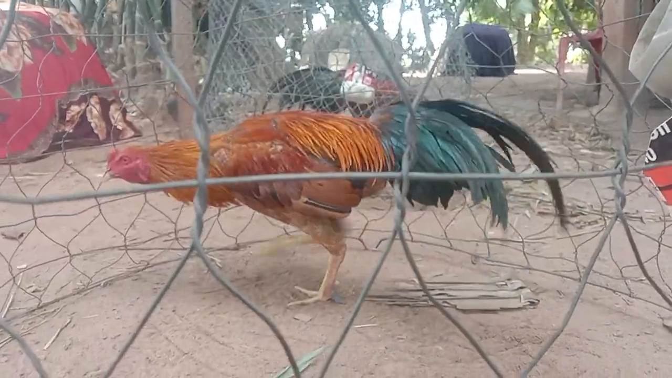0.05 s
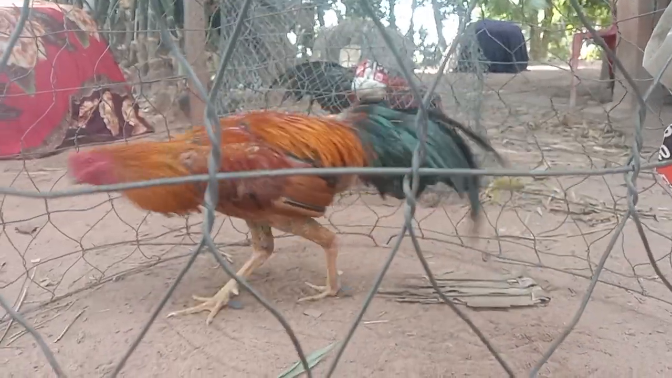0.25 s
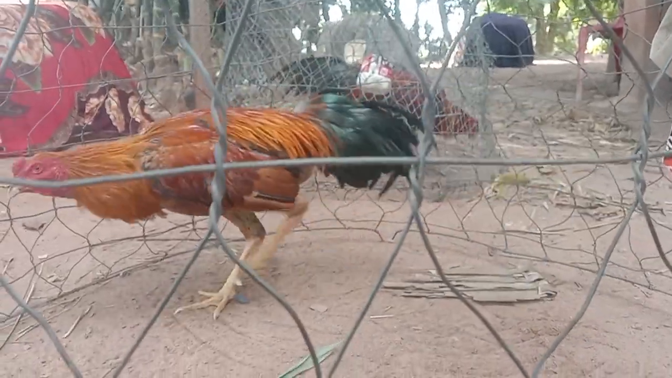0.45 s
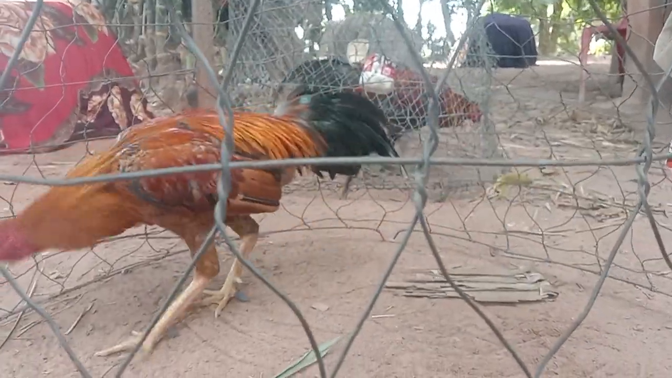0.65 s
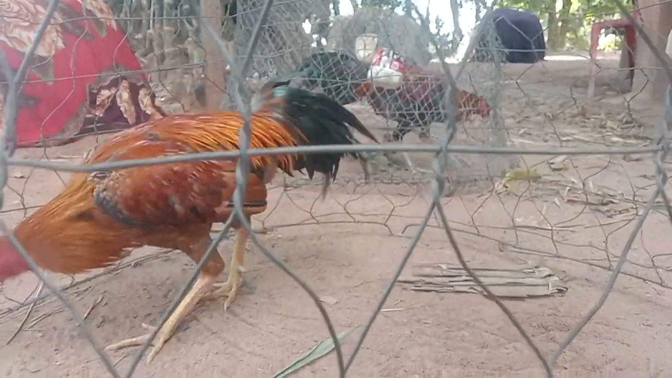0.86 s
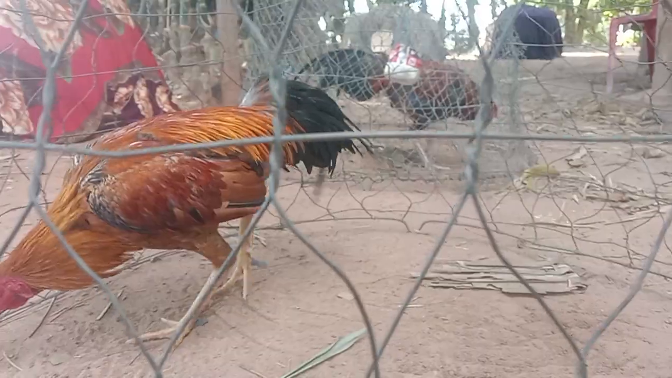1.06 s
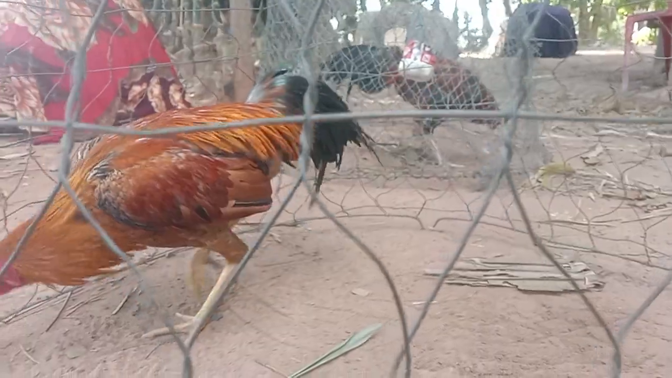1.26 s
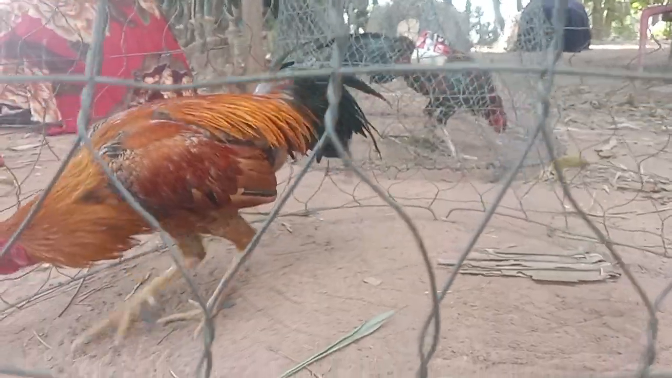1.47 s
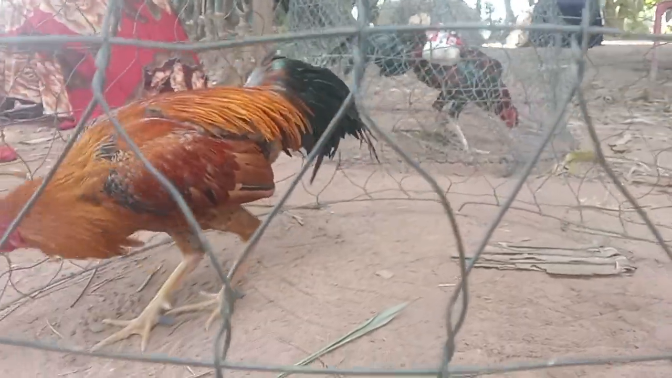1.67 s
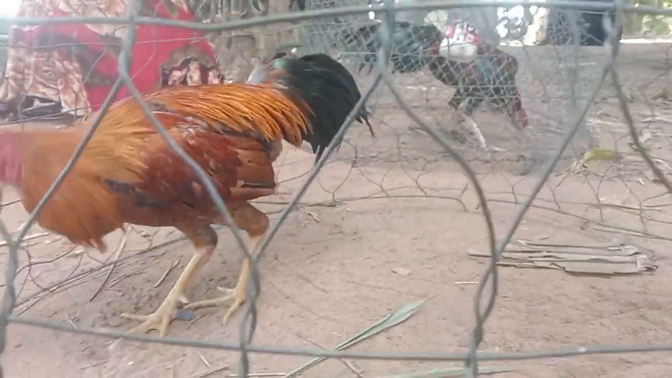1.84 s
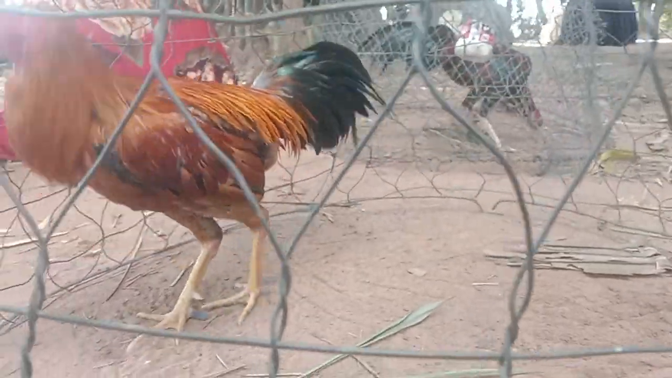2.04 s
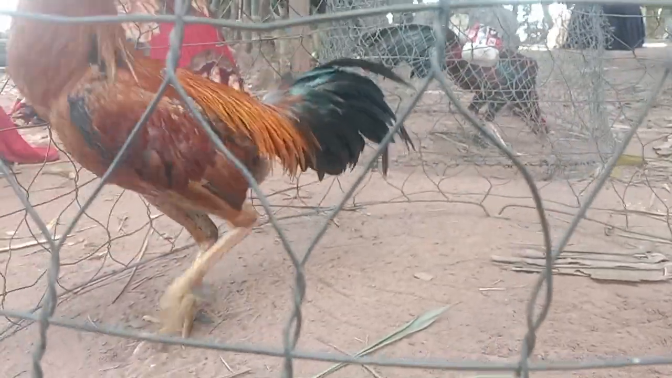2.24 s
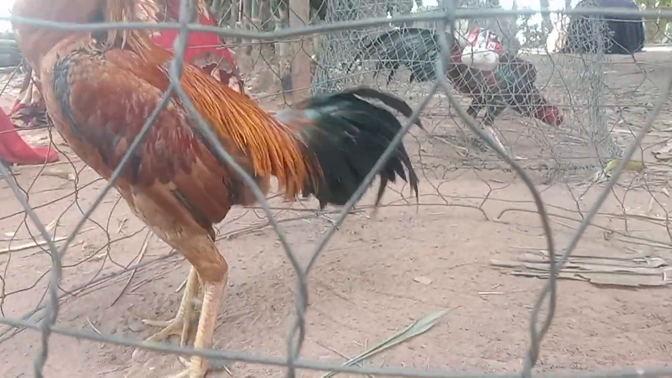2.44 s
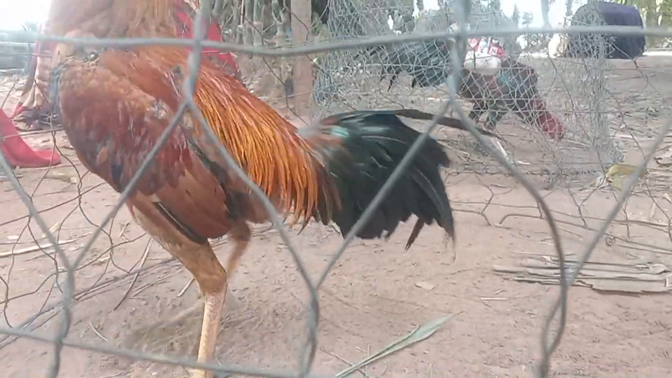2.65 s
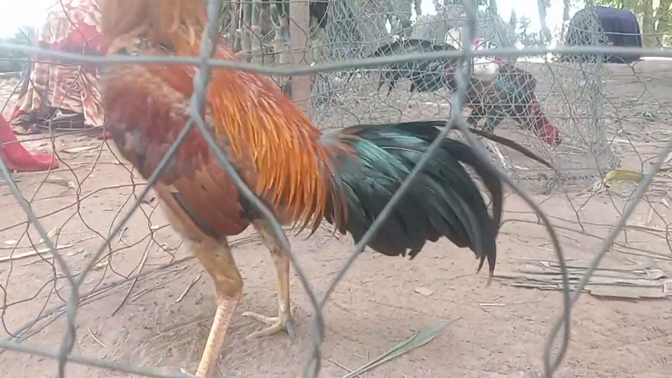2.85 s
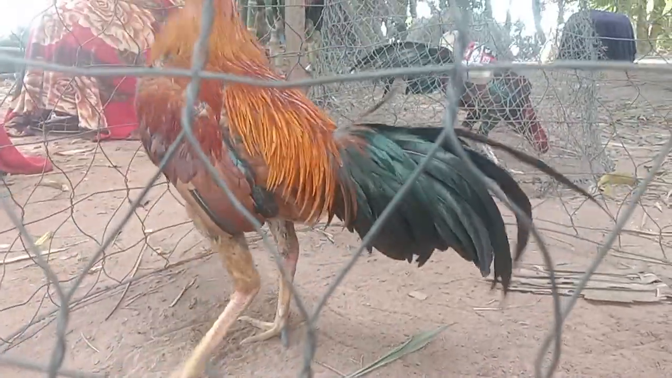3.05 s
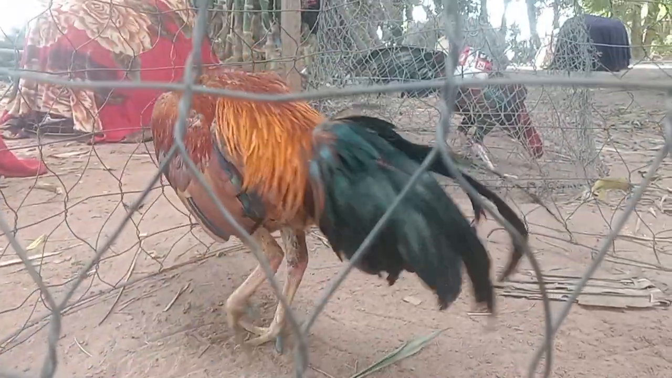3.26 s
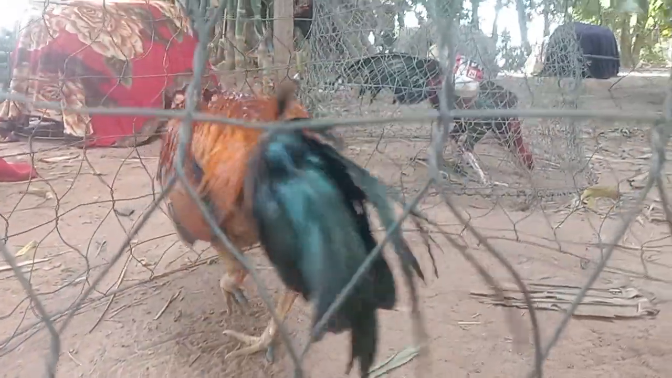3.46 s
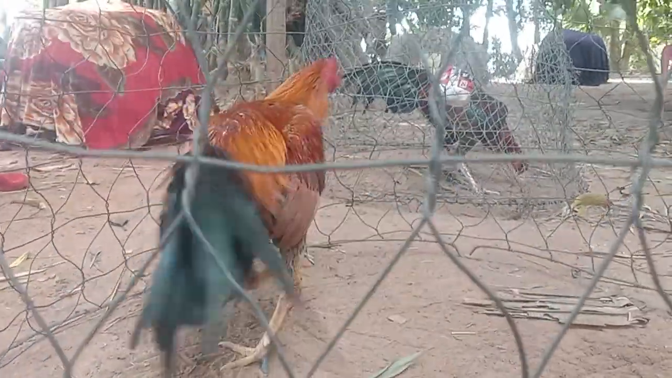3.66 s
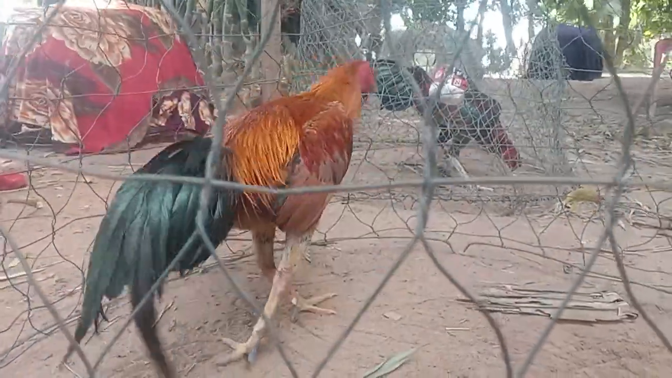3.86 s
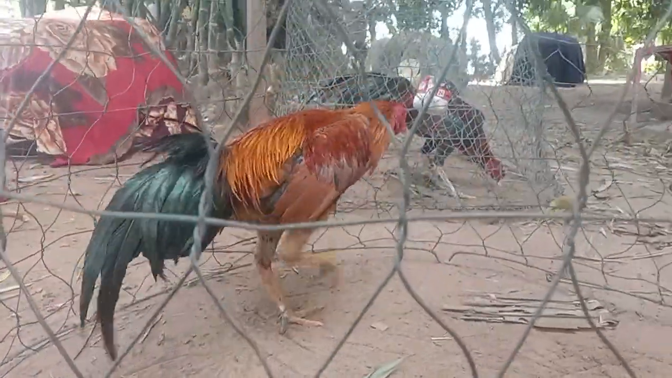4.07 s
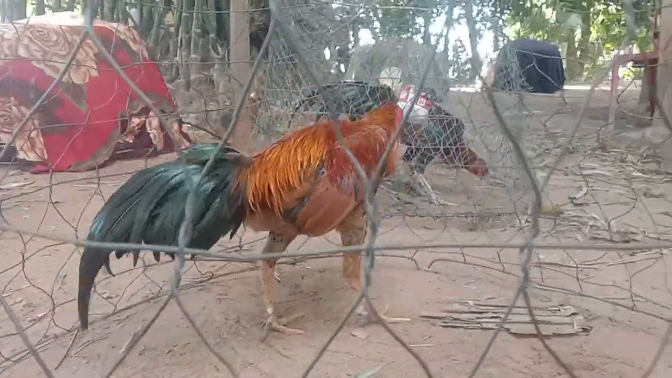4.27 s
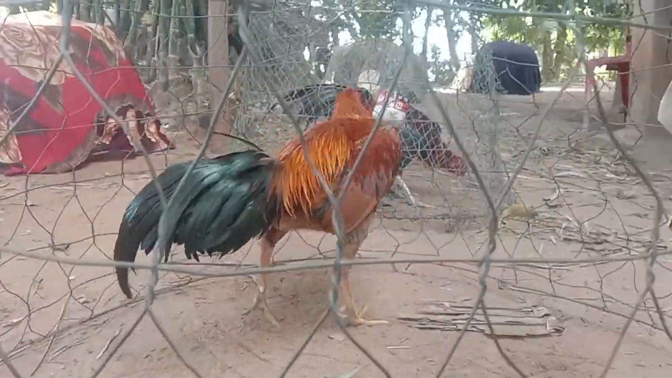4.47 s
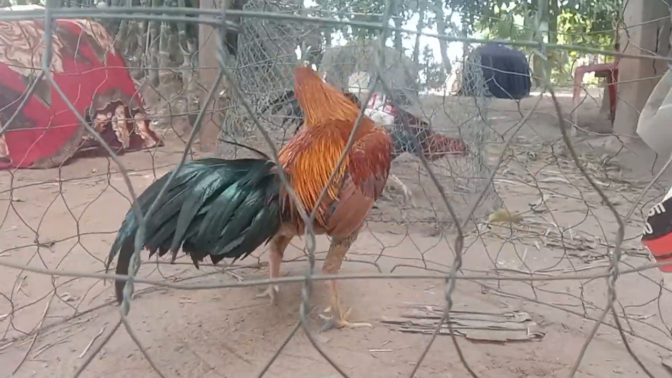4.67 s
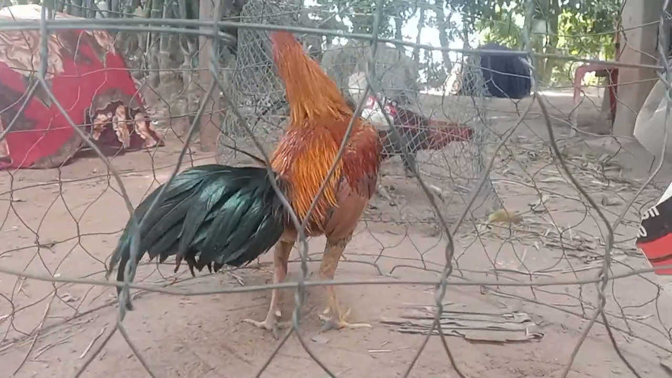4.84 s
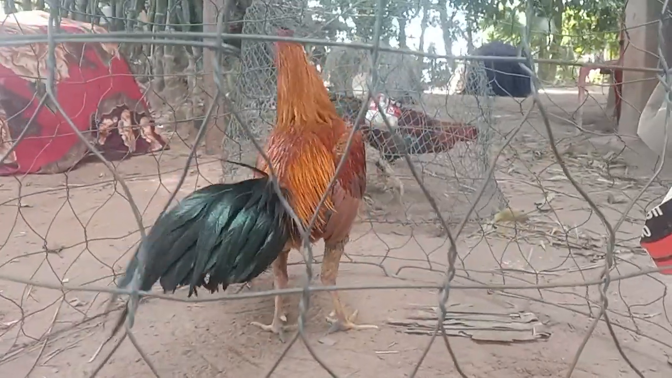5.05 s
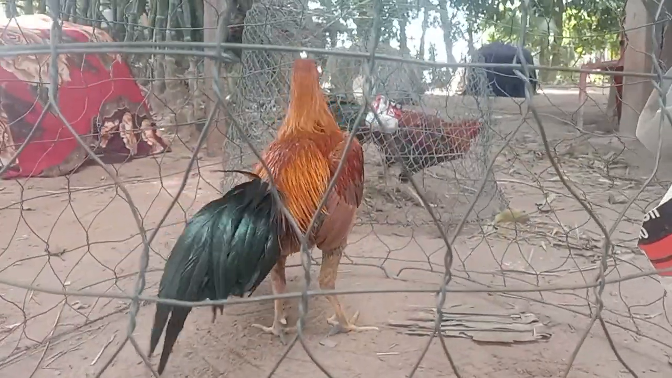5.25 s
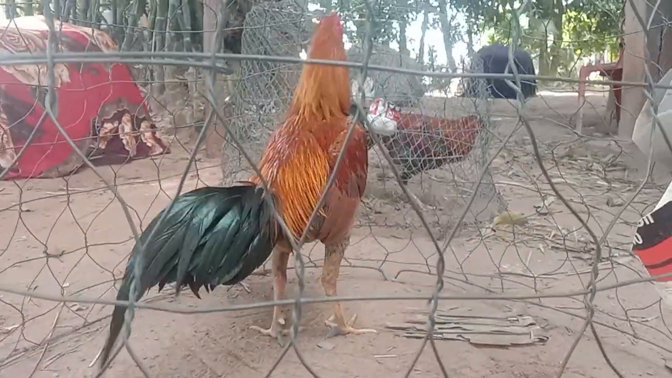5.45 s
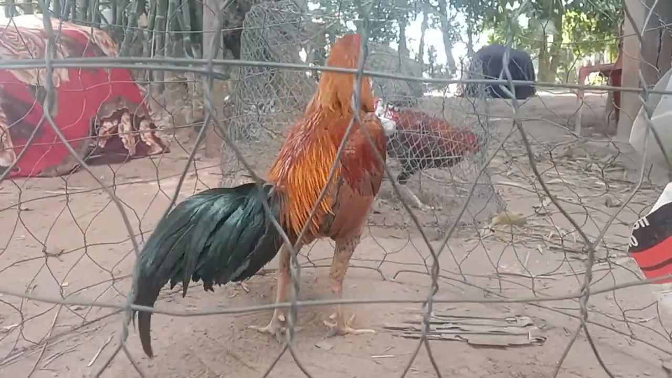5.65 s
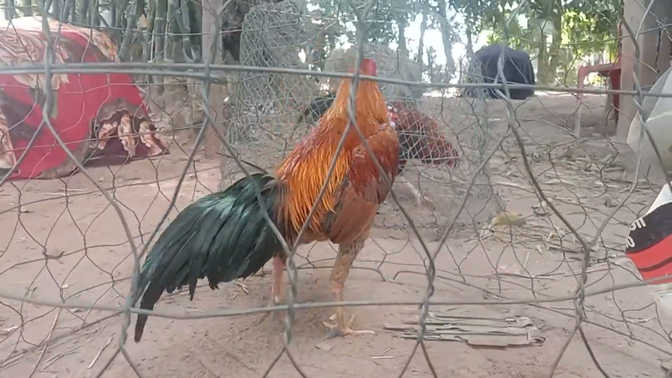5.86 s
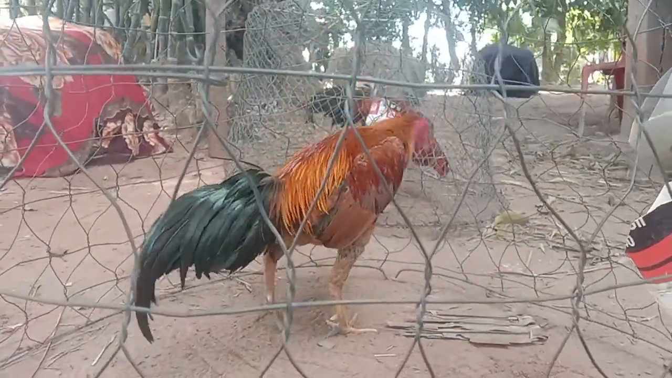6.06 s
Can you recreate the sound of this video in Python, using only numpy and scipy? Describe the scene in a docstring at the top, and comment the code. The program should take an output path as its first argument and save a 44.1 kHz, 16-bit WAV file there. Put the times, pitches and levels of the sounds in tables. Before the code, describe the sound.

Outdoors in a yard among trees, wind bumps softly at the microphone before a rooster crows loudly close by: two quick syllables, then a longer rasping one that drops to a clear held note. A short echo follows. Afterwards come sparse, brief hen clucks, low wind thuds, one sharper pop, faint chick peeps and a quiet leafy hush.

```python
"""A farm yard among trees: a rooster crows close by, two short syllables and a long one that breaks from
hoarse to clear. The clear voice is summed overtones, the hoarse one irregular slaps ringing the windpipe.
Wind rumbles at the microphone as low noise cut into bursts; a hen clucks in short bursts of voice cycles.
Small birds chirp and far poultry murmur as gliding tones with echoes. Scuffs, leaves, a distant flock
and insects are shaped noise and faint random calls."""
import sys
import numpy as np
from scipy import signal
from scipy.fft import rfft, irfft, next_fast_len
from scipy.io import wavfile
from scipy.ndimage import uniform_filter1d, map_coordinates

SR = 44100
rng = np.random.default_rng(int(sys.argv[2]) if len(sys.argv) > 2 else 0)


def transcribe(u):
    """Save the signal u as a 16-bit wav file named by the first command-line argument.

    u: samples, shape (n,) or (channels, n), limited to [-1, 1]; the rate is SR.
    q: integer samples, one column per channel.
    """
    v = np.clip(np.atleast_2d(u).T, -1, 1)
    q = np.round(v * 32767).astype(np.int16)
    wavfile.write(sys.argv[1], SR, q)


N = 269451


def amp(db):
    """Decibels to gain."""
    return 10 ** (np.asarray(db) / 20)


def unit(x):
    """Scaled to rms 1."""
    return x / np.sqrt(np.mean(x ** 2) + 1e-20)


def along(points, hz):
    """Values at hz, read from (Hz, value) points on a log frequency axis."""
    point_hz, value = np.transpose(points)
    return np.interp(np.log(hz + 1), np.log(point_hz + 1), value)


def curves(rows):
    """One value per sample for each column after the time."""
    seconds, *columns = np.transpose(rows)
    return [np.interp(np.arange(N) / SR, seconds, column) for column in columns]


def wobble(rate, size=N):
    """A smooth random curve, rate knots a second."""
    knots = rng.standard_normal(int(size * rate / SR) + 4)
    return map_coordinates(knots, [np.arange(size) * rate / SR])


def filtered(x, response):
    """x shaped by a gain that depends on frequency."""
    m = next_fast_len(N + SR // 2)
    return irfft(rfft(x, m) * response(np.fft.rfftfreq(m, 1 / SR)), m)[..., :N]


def rush(spectrum):
    """Coloured noise of rms 1."""
    return unit(filtered(rng.standard_normal(N), lambda hz: amp(along(spectrum, hz))))


def patchy(x, patchy_db):
    """x at rms 1 with patches of random gain in time and frequency."""
    z = signal.stft(x, nperseg=512)[2]
    field = uniform_filter1d(rng.standard_normal(z.shape), size=3, axis=0)
    field = uniform_filter1d(field, size=10, axis=1)
    return unit(signal.istft(z * amp(patchy_db * unit(field)), nperseg=512)[1][:N])


def add(track, s, x):
    """Mix x into track from time s."""
    part = track[max(round(s * SR), 0):][:len(x)]
    part += x[:len(part)]


def notes(table, blur, widest_hz=260):
    """Gliding tones with soft ends; an unsteady throat makes each a narrow band, blur times its pitch wide."""
    out = np.zeros(N)
    for s, length, start_hz, end_hz, db in table:
        n = round(length * SR)
        turn = 2 * np.pi * np.cumsum(np.geomspace(start_hz, end_hz, n)) / SR
        a, b = (wobble(min(blur * start_hz, widest_hz), size=n) for _ in "ab")
        tone = a * np.sin(turn) + b * np.cos(turn)
        add(out, s, amp(db + 5.5) * signal.windows.tukey(n, .3) * tone)
    return out


# Overtone balance of the clear voice. Each row: frequency in Hz, relative level in dB.
CLEAR_OVERTONES = [(520, -4.5), (600, 1), (780, -1), (1090, 0), (1500, -2.5), (1750, -20.5), (2300, -23),
                   (3000, -18.5), (3600, -24), (4250, -19), (4800, -31), (5500, -32), (7200, -33),
                   (9500, -58.5)]
# Brightness alternating from cycle to cycle. One row: middle in seconds, half length in seconds, depth in dB.
CYCLE_DOUBLING = (1.785, .04, -2)
# The beak half closes for the held note and dulls the overtones around this pitch.
NARROWS_S, NARROW_HZ, NARROW_DB = 1.62, 4730, -18


def clear_voice(hz, hoarse):
    """Steady membranes: fifteen overtones locked to the pitch."""
    t = np.arange(N) / SR
    turns = np.cumsum(hz * (1 + (.0025 + .04 * hoarse) * wobble(90))) / SR
    k = np.arange(1, 16)[:, None]
    narrow_db = NARROW_DB * (t > NARROWS_S) * np.exp(-(np.log(k * hz / NARROW_HZ) / .33) ** 2)
    # hoarseness takes the upper overtones away first
    blur_db = 2.5 * hoarse * np.maximum(k - 2, 0)
    size = amp(along(CLEAR_OVERTONES, k * hz) + narrow_db - blur_db)
    # each high overtone comes and goes
    size[2:] *= amp([5 * wobble(20) for _ in k[2:]])
    middle, half, doubling_db = CYCLE_DOUBLING
    moment = np.exp(-((t - middle) / half) ** 2)
    size[2:] *= 1 + amp(doubling_db) * moment * np.sin(np.pi * turns)
    overtones = size * np.sin(2 * np.pi * k * turns + k * k)
    return np.sum(overtones, axis=0) / np.sqrt(np.sum(size ** 2, axis=0) / 2)


# Windpipe and beak resonances of the hoarse voice. Each row: centre in Hz, width in Hz, level in dB.
WINDPIPE = [(640, 90, -1.5), (740, 44, -4), (976, 200, -2.5), (1430, 170, -2.5), (1945, 69, -11.5),
            (2675, 170, -14), (3720, 280, -16.5), (4440, 140, -29.5), (5240, 200, -28.5),
            (6870, 1000, -31.5)]


def windpipe(f):
    """Resonances added as power, thinned below 470 Hz and above 8 kHz."""
    power = sum(amp(2 * db) / (1 + np.abs(2 * (f - c) / w) ** 2.46) for c, w, db in WINDPIPE)
    return np.sqrt(power) / (1 + (470 / (f + 1)) ** 8) * (.05 + 1 / (1 + (f / 8000) ** 8))


# The hoarse voice keeps catching; each catch sweeps the pitch up by this natural-log interval.
STUTTERS_PER_S, SWEEP = 135, .75


def hoarse_voice(hz):
    """The membranes slap irregularly into the windpipe, which rings."""
    catch = np.cumsum(STUTTERS_PER_S * np.exp(.2 * wobble(60)) / SR) % 1
    beats = np.cumsum(hz * np.exp(SWEEP * (catch - .5) + .1 * wobble(500)) / SR)
    # one click per beat, swelling and fading within each catch
    slaps = np.diff(np.floor(beats), prepend=0) * amp(2.5 * wobble(300)) * np.sin(np.pi * catch) ** .6
    breath = 0.4 * rng.standard_normal(N)
    slaps = unit(slaps - slaps.mean()) + breath
    # the beak keeps shifting the resonances
    rough = patchy(filtered(slaps, windpipe), patchy_db=2.5)
    # the swing of the membranes is bounded
    return unit(rough / np.abs(uniform_filter1d(rough ** 2, size=130)) ** .38)


def beak(voice, c, w, lift_db):
    """The beak's gap cuts a dip at c and lifts the band above it."""
    def response(f):
        dip = 1 - 0.85 / (1 + ((f - c) / w) ** 2)
        return dip * amp(lift_db / (1 + (c / (f + 1)) ** 8) / (1 + (f / (1.3 * c)) ** 8))
    return filtered(voice, response)


# The beak's gap dips each syllable. Each row: centre in Hz, half width in Hz, lift above the dip in dB.
BEAK_GAPS = [(4700, 800, 14), (4900, 350, 4), (5750, 400, 3)]
# Air wheezing in the beak as the crow ends.
# Each row: start in seconds, length in seconds, start pitch in Hz, end pitch in Hz, relative level in dB.
BEAK_WHEEZES = [(1.83, 0.043, 4400, 4670, -52), (1.87, 0.123, 5080, 5160, -49),
                (1.95, 0.098, 2985, 3380, -54.5)]
# Least hoarse share: some rasp stays in the clearest voice, less in the held note.
BREATHY, BREATHY_HELD = .07, .004


def rooster():
    """Clear and hoarse voices share the throat by power, then pass the beak."""
    hz, db, hoarse, now = syllables()
    t = np.arange(N) / SR
    hoarse = np.clip(hoarse, np.where(t > NARROWS_S, BREATHY_HELD, BREATHY), 1)
    clear = clear_voice(hz, hoarse)
    rough = hoarse_voice(hz)
    voice = np.sqrt(1 - hoarse) * clear * amp(1.1 * hoarse * wobble(50)) + np.sqrt(hoarse) * rough
    voice = np.choose(now, [beak(voice, *row) for row in BEAK_GAPS])
    return amp(db) * voice + notes(BEAK_WHEEZES, blur=0.63, widest_hz=970)


# Three syllables, whose pitch breaks between a low and a high register.
# Each row: time in seconds, pitch in Hz, level in dB, hoarse share from 0 to 1.
CROW_SYLLABLES = [
    [(.749, 555, -20.5, 0.29), (.786, 593.7, -14, 0.01), (.804, 592.3, -15.5, 0.65),
     (.865, 514.5, -17, 0.73)],
    [(1, 573.4, -21.5, 0.83), (1.014, 602.2, -14, 0.13), (1.041, 614.3, -13, 0.11),
     (1.043, 777.6, -11.5, 0), (1.085, 766.7, -15, 0.04), (1.11, 729.3, -13.5, 0.29),
     (1.16, 740.6, -27, 0.4)],
    [(1.172, 488.5, -18.5, 0.5), (1.221, 610, -14.5, 0), (1.223, 781.6, -12, 0.6), (1.27, 792.5, -14, 0.1),
     (1.3, 787.3, -15.5, 0.6), (1.36, 771, -14, .85), (1.616, 690.5, -23, 0.78), (1.622, 512, -17.5, 0.36),
     (1.65, 556.6, -16.5, 0), (1.84, 546.3, -18.5, 0), (1.89, 513, -18.5, 0)],
]
ATTACK_DB_PER_S, RELEASE_DB_PER_S = 3000.5, 897


def syllables():
    """Each syllable opens fast and dies away; the loudest at any moment has the throat."""
    t = np.arange(N) / SR
    hz, db, hoarse = np.transpose([curves(rows) for rows in CROW_SYLLABLES], axes=(1, 0, 2))
    edge_db = []
    for rows in CROW_SYLLABLES:
        opening = ATTACK_DB_PER_S * np.maximum(rows[0][0] - t, 0)
        edge_db.append(opening + RELEASE_DB_PER_S * np.maximum(t - rows[-1][0], 0))
    level_db = db - edge_db
    now = np.argmax(level_db, axis=0)
    return np.choose(now, hz), level_db.max(axis=0), np.choose(now, hoarse), now


# Bursts of wind rumble that the recorder's noise suppressor lets through.
# Each row: start in seconds, length in seconds, relative level in dB.
RUMBLE_BURSTS = [(0.026, 0.13, -32), (0.203, .15, -48), (0.354, 0.21, -30), (0.576, 0.074, -37.5),
                 (0.648, 0.14, -28), (0.79, 0.14, -39.5), (1.041, 0.083, -29.5), (1.135, 0.12, -20),
                 (1.319, 0.12, -32), (1.491, 0.42, -32), (2.04, 0.067, -46.5), (2.457, 0.097, -27.5),
                 (2.58, 0.082, -36.5), (2.778, 0.028, -34), (2.868, 0.096, -45.5), (3.304, 0.18, -25.5),
                 (3.498, 0.2, -43.5), (3.792, 0.052, -37.5), (4.116, 0.13, -39), (4.439, 0.2, -34),
                 (4.877, 0.2, -47), (5.108, 0.2, -38.5), (5.585, 0.14, -26.5), (5.766, 0.09, -27),
                 (5.913, 0.16, -58.5)]
# Pops near the end of a burst. Each row: time in seconds, relative level in dB.
WIND_POPS = [(3.46, -11), (5.7, -31), (5.862, -33)]
# Colour of the low rumble. Each row: frequency in Hz, relative level in dB per Hz.
RUMBLE_COLOUR = [(20, -49), (50, -9), (110, 1), (180, -9), (270, -28), (1000, -80)]
# Colour of the sharper edge of strong bursts. Each row: frequency in Hz, relative level in dB per Hz.
BITE_COLOUR = [(100, -19.5), (250, 4), (400, -18.5), (1300, -85)]
# rumble left between the bursts and how much it puffs
LULL_DB, PUFF_DB, PUFFS_PER_S = -66.5, 7.5, 5.4
# the sharp edge grows by this power of the rumble
BITE_DB, BITE_GROWS = -2.5, 1.676


def wind():
    """Wind rumble at the microphone, lumpy and low, cut into bursts by the recorder's noise suppressor."""
    gate = amp(LULL_DB + PUFF_DB * wobble(PUFFS_PER_S))
    for s, length, db in RUMBLE_BURSTS:
        add(gate, s, amp(db - 1.0) * signal.windows.tukey(round(length * SR), .5))
    pops, t = np.zeros(N), np.arange(-200, 200) / SR
    snap = (t / 0.0021) ** 2
    for s, db in WIND_POPS:
        add(pops, s + t[0], amp(db) * (2 * snap - 1) * np.exp(-np.sqrt(snap + 0.0078) - snap))
    eddies = amp(7.3 * wobble(35)) * rush(RUMBLE_COLOUR)
    # the rumble is evened out over about 70 ms before the gate
    steady = np.sqrt(np.abs(uniform_filter1d(eddies ** 2, size=3000)))
    rumble = gate * eddies / steady
    strength = np.sqrt(np.abs(uniform_filter1d(rumble ** 2, size=600)))
    return rumble + amp(BITE_DB) * strength ** BITE_GROWS * rush(BITE_COLOUR) + pops


# Hen clucks. Each row: end of the swell in seconds, relative level in dB, pitch in Hz, length in seconds.
HEN_CLUCKS = [(2.357, -22.5, 326.5, 0.008), (2.638, -42.5, 372, 0.016), (3.633, -25.5, 295.3, 0.017),
              (3.767, -29, 320.6, 0.007), (3.902, -34.5, 317.4, 0.0081), (4.042, -37, 314, 0.018),
              (4.797, -29.5, 418, 0.013)]
# Overtone balance of the hen. Each row: frequency in Hz, relative level in dB.
HEN_OVERTONES = [(300, -5), (600, 0), (1000, -1), (1500, -11), (1900, -41), (2600, -43)]
# a longer cluck is duller: tilt in dB an octave, and its fall per second of length
SHARP_DB, DULLS_DB_PER_S = 11.5, 859


def hen():
    """Each cluck is a few voice cycles that swell and stop short; a near wall repeats it."""
    out, k = np.zeros(N), np.arange(1, 7)[:, None]
    for end, db, hz, length in HEN_CLUCKS:
        t = np.arange(round((length + 0.013) * SR)) / SR - length
        tilt_db = (SHARP_DB - DULLS_DB_PER_S * length) * np.log2(k / 3)
        size = amp(along(HEN_OVERTONES, k * hz) + tilt_db + rng.normal(0, 3, k.shape))
        cycles = np.cos(2 * np.pi * k * hz * (t + 3 * t * t) - .5 * k)
        voice = unit(np.sum(size * cycles, axis=0))
        swell = np.where(t < 0, (1 + t / length) ** 0.77, amp(-60 * t / 0.0085))
        add(out, end - length, amp(db - 3.0) * voice * swell)
    return out + amp(-20.5) * np.roll(out, round(0.011 * SR))


# Foot and feather scuffs. Each row: start in seconds, length in seconds, level in dB.
DUST_SCUFFS = [(0, 0.045, -46), (0.585, 0.05, -50.5), (0.634, 0.15, -48.5), (2.493, 0.087, -54),
               (4.771, 0.093, -63.5), (5.024, .09, -57), (5.186, 0.13, -57), (5.408, 0.059, -53.5)]
# Colour of the scuffs. Each row: frequency in Hz, relative level in dB per Hz.
SCUFF_COLOUR = [(290, -70), (500, -21), (1720, -6.5), (2160, -27.5), (3380, -1), (7560, -16), (9370, -28),
                (15500, -17.5)]


def scuffs():
    """Short grainy scrapes in dry dust."""
    gate = np.zeros(N)
    for s, length, db in DUST_SCUFFS:
        add(gate, s, amp(db) * signal.windows.tukey(round(length * SR), .3))
    return gate * patchy(amp(4.2 * wobble(230)) * rush(SCUFF_COLOUR), patchy_db=7)


# Falling peeps of a chick. Each row: start in seconds, start pitch in Hz, relative level in dB.
CHICK_PEEPS = [(0.33, 4090, -64), (2.369, 3960, -68), (3.046, 5220, -66), (3.499, 3790, -74),
               (3.929, 4206, -67.5), (4.974, 4320, -62.5), (5.43, 4525, -64.5), (5.956, 4300, -62.5)]
# Far birds and poultry.
# Each row: start in seconds, length in seconds, start pitch in Hz, end pitch in Hz, relative level in dB.
FAR_MURMURS = [(.07, 0.18, 6370, 5160, -59.5), (3.53, 0.23, 865, 920, -68), (4.22, 0.37, 331.6, 347.6, -62),
               (4.34, 0.14, 886, 916, -67.5), (4.5, 0.17, 5320, 4275, -72.5),
               (4.61, 0.29, 6460, 6230, -68.5), (4.74, 0.16, 2880, 2010, -69),
               (5.24, 0.08, 969, 1054, -60.5)]


def far_birds():
    """Gliding calls, heard directly and a little more strongly as echoes."""
    # all peeps fall at 0.115 s an octave to the same pitch
    peeps = [(s, np.log2(hz / 2500) * .115, hz, 2500, db) for s, hz, db in CHICK_PEEPS]
    far = notes(peeps, blur=.05) + notes(FAR_MURMURS, blur=.17)
    return amp(-3) * far + amp(-2) * trees(far, reach=.45)


# Decay of the echoes. Each row: frequency in Hz, time to fall 60 dB in seconds, before scaling by reach.
TREE_DECAY = [(300, 0.077), (1500, 0.52), (4500, 0.23)]


def trees(x, reach, sway_db=2):
    """Trunks and sheds answer; each frequency dies at its own speed, and swaying leaves smear the pitch."""
    hz, t, z = signal.stft(rng.standard_normal(SR // 2), SR, nperseg=256)
    decay = amp(-60 * t / (reach * along(TREE_DECAY, hz)[:, None]))
    tail = signal.istft(z * decay, SR, nperseg=256)[1]
    swayed = x * amp(sway_db * wobble(140))
    # the answer sets in 450 samples late
    return signal.fftconvolve(np.pad(swayed, (450, 0)), tail / np.linalg.norm(tail))[:N]


# Background level of leaves and distant flock; the recorder's noise suppressor ducks it after the last pop.
# Each row: time in seconds, relative level in dB.
BACKGROUND_LEVEL = [(0, -55.5), (.5, -67.5), (.65, -61), (2.3, -62.5), (3, -72.5), (4.2, -72.5), (4.8, -64),
                    (5.84, -63), (5.88, -82.5), (6.11, -61.5)]
# Colour of the leaves, which also weights the flock. Each row: frequency in Hz, relative level in dB per Hz.
LEAF_COLOUR = [(400, -7.5), (1000, 2), (1700, 0), (3500, -1), (7800, -4.5), (8800, -24), (13000, -21.5),
               (15500, -33)]
# Colour of the steady far insect hiss. Each row: frequency in Hz, relative level in dB per Hz.
INSECT_COLOUR = [(3000, -58.5), (6200, -10), (6600, 1), (7100, -11.5), (7800, -2.5), (8400, -22.5),
                 (12000, -16.5), (15500, -21.5)]
INSECTS_DB = -83


def yard():
    """Patchy hush of leaves and short random calls of the distant flock, over steady insects."""
    when, pitch, size = rng.random((110, 3)).T
    hz = 800 * 8 ** pitch
    # longer calls are fainter
    call_db = along(LEAF_COLOUR, hz) - 22 * size
    calls = notes(zip(when * N / SR, .04 + .08 * size, hz, .96 * hz, call_db), blur=.03)
    hush = .8 * patchy(rush(LEAF_COLOUR), patchy_db=3) + .75 * unit(calls)
    level = amp(curves(BACKGROUND_LEVEL)[0] + 2.9 * wobble(8))
    return level * hush + amp(INSECTS_DB) * rush(INSECT_COLOUR)


def scene():
    """Near crow and half-far hen with their echoes, wind, scuffs, far birds and the yard."""
    crow, clucks = rooster(), hen()
    echoes = trees(amp(-12.5) * crow, reach=0.94, sway_db=5) + trees(amp(-12.5) * clucks, reach=0.42)
    return (crow + clucks + echoes + far_birds() + scuffs() + wind() + yard())[None]


TOP_HZ, LOW_CUT_HZ = 15550, 60


def record(dry):
    """The recorder thins the deepest bass and keeps nothing above its band limit."""
    return filtered(dry, lambda hz: (hz < TOP_HZ) / np.sqrt(1 + (LOW_CUT_HZ / (hz + 1)) ** 4))


dry = scene()
out = record(dry)
transcribe(out)
```